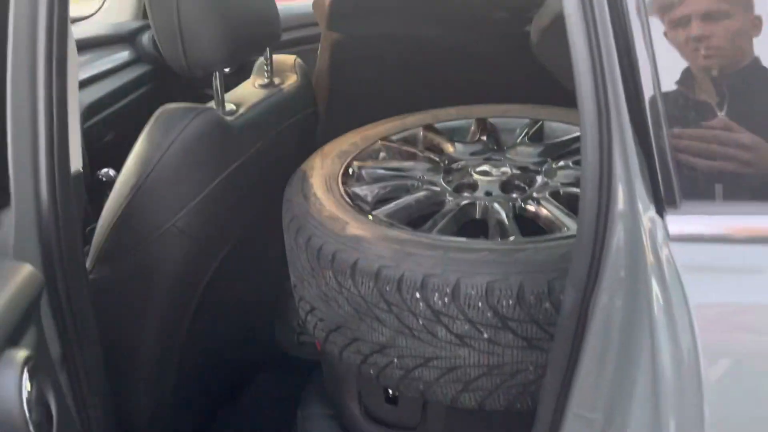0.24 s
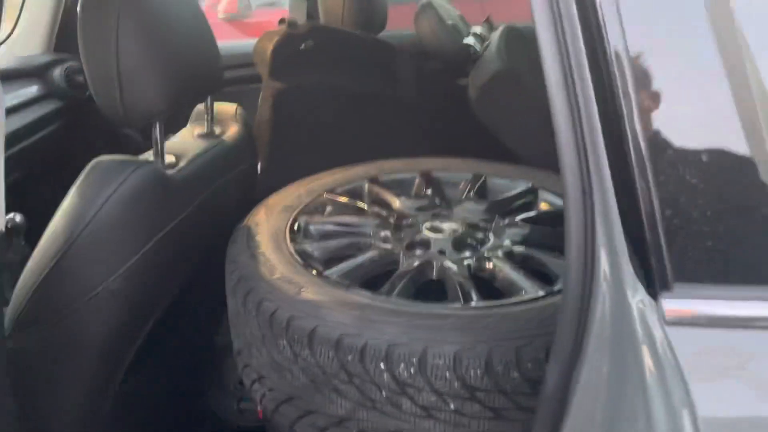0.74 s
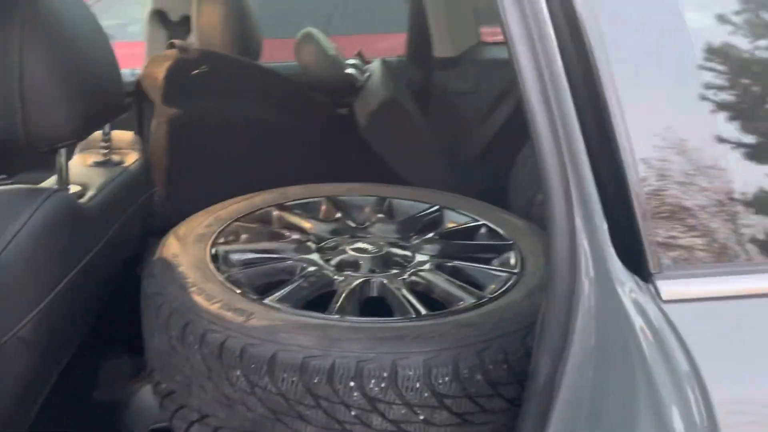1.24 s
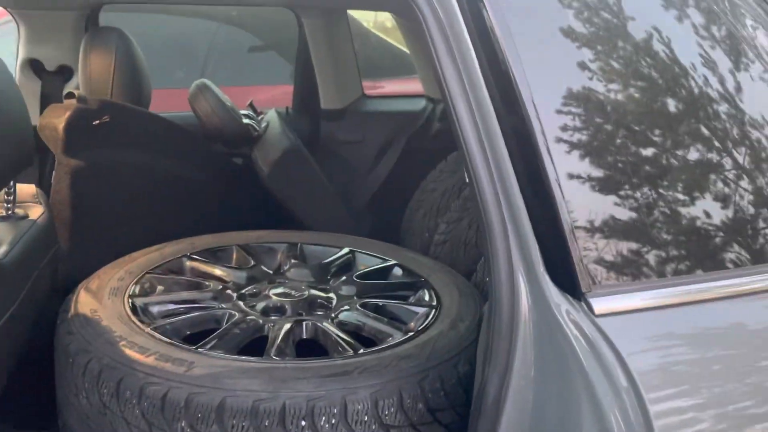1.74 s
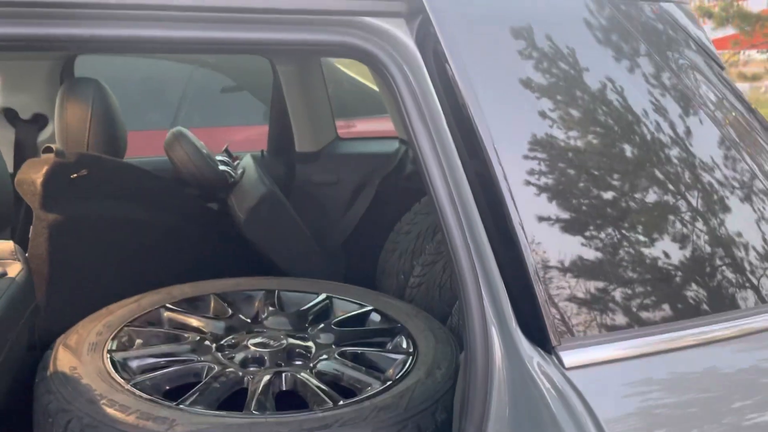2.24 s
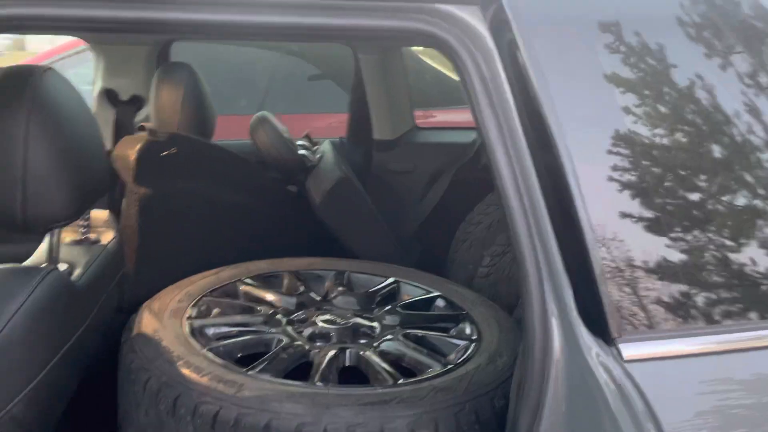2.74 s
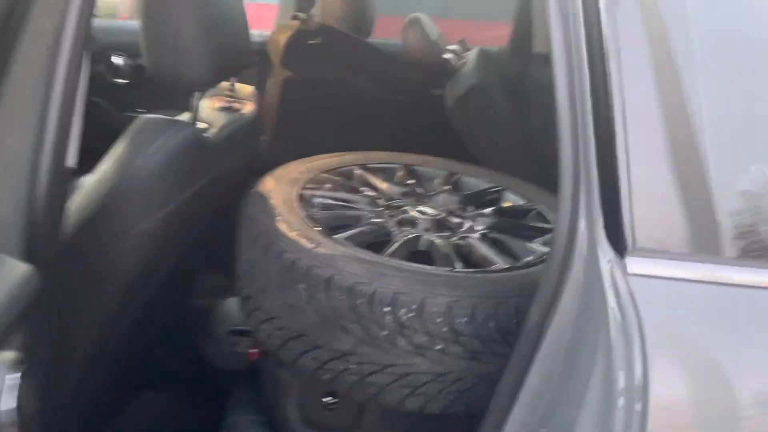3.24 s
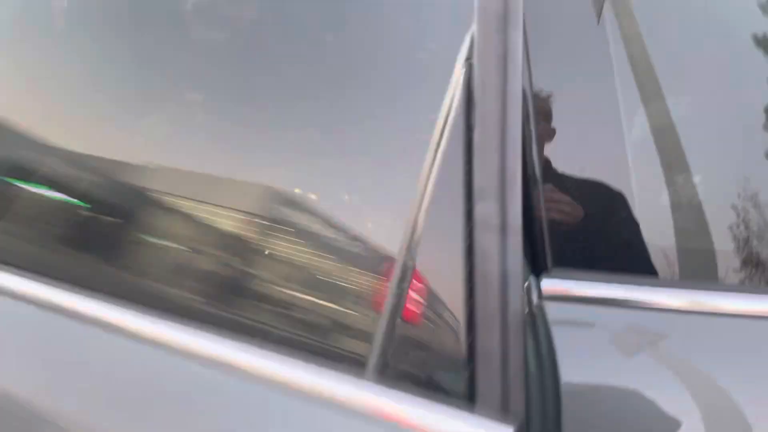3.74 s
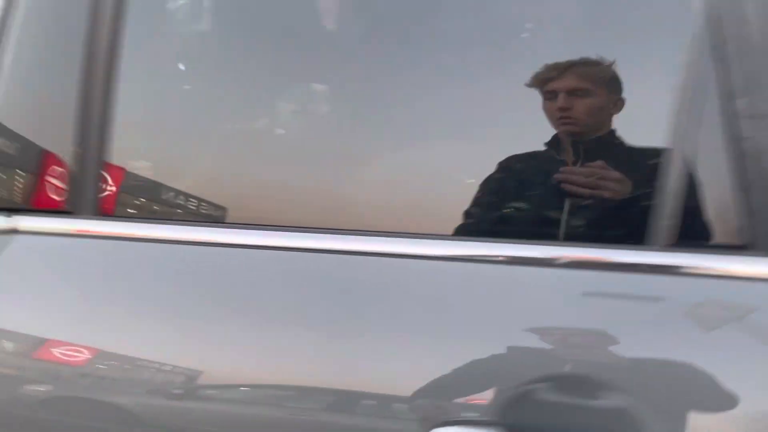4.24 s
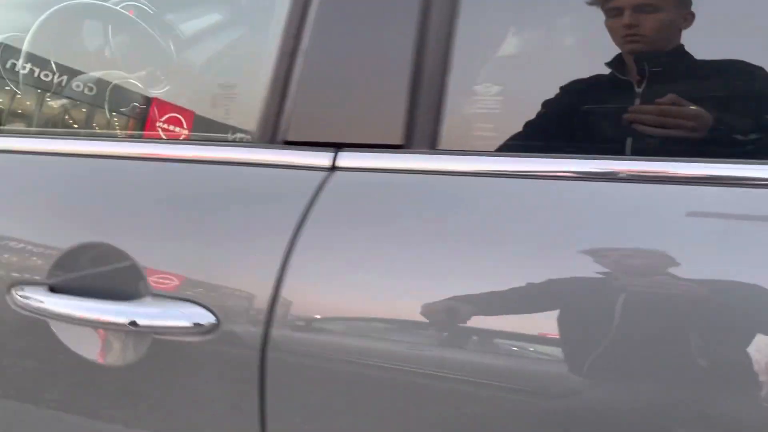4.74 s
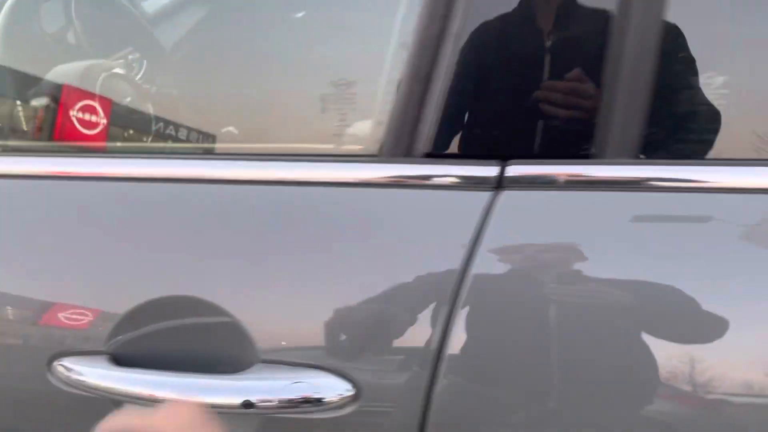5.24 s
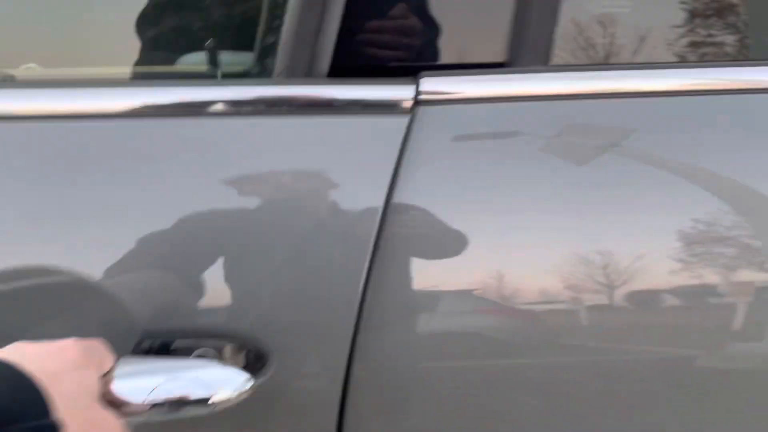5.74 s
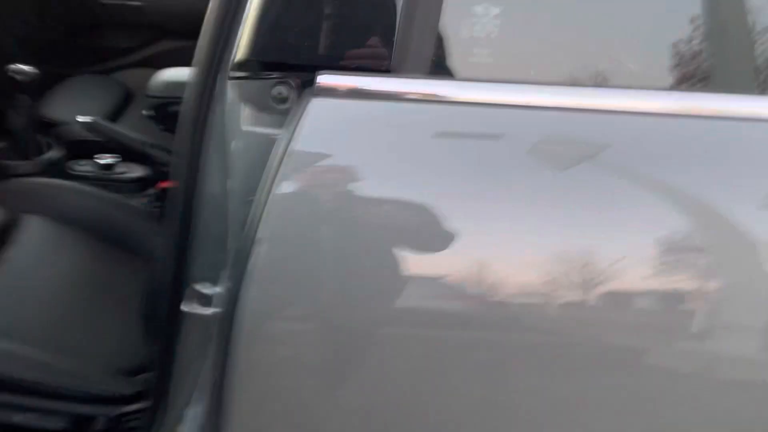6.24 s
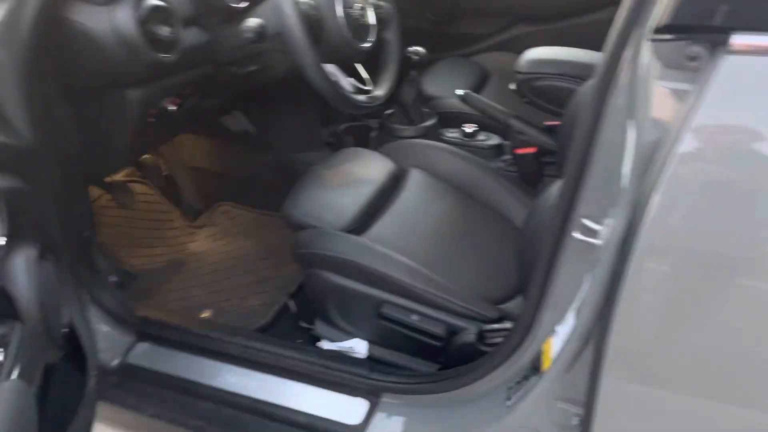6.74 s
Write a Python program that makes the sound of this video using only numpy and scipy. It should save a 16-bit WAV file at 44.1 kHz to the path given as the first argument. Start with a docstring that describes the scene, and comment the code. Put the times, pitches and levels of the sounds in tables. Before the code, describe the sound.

Keys jingle and a jacket rustles over outdoor traffic rumble; one car door thuds shut and another clunks open.

```python
"""Distant traffic rumbles over a car lot while a jacket rustles and keys jingle close by. A car passes
with a swell of tyre noise and engine tones. A rear door slams, a handle is pulled, and the front door
unlatches and swings into its stop. The fabric is a spray of tiny snaps; the keys tick and ring. Each
blow on a door rings its panel and cracks at the latch, and the cabin air booms as a door seals or unseals."""
import sys
import numpy as np
from scipy import signal
from scipy.fft import rfft, irfft
from scipy.io import wavfile

SR = 44100
rng = np.random.default_rng(int(sys.argv[2]) if len(sys.argv) > 2 else 0)


def materialize(psi):
    """Save the field psi as 16-bit PCM at rate SR to the path in sys.argv[1].

    A 1-D psi becomes a single channel; in a 2-D psi each row is a channel.
    """
    bounded = np.clip(np.atleast_2d(psi).T, -1, 1)
    quanta = np.round(bounded * 32767).astype(np.int16)
    wavfile.write(sys.argv[1], SR, quanta)


N = 308700
TIME = np.arange(N) / SR

# The crisp colour of jacket and keys. Each row: frequency in Hz, relative level in dB.
RUSTLE_SPECTRUM = [(900, -33), (1500, -8.5), (2200, -1.5), (2700, -5.5), (3300, -8.5), (5300, -9),
                   (6600, -9), (8100, -13), (9600, -9), (10500, -11.5), (12400, -16.5), (14000, -22),
                   (16000, -41)]
# The colour of door hardware cracking or scraping. Each row: frequency in Hz, relative level in dB.
HARDWARE_SPECTRUM = [(650, -4.5), (1150, -2), (1500, -4), (2400, -16.5), (4000, -15.5), (6400, -17.5),
                     (8300, -19.5), (11800, -28), (14000, -27), (16000, -52)]


def from_db(db):
    return 10 ** (np.asarray(db) / 20)


def rms_one(x):
    return x / np.sqrt(np.mean(x ** 2) + 1e-20)


def in_time(rows):
    s, *columns = np.transpose(rows)
    return [np.interp(TIME, s, c) for c in columns]


def at_hz(points, hz):
    table = np.array(points)
    return np.interp(np.log(hz + 1), np.log(table[:, 0] + 1), table[:, 1])


def fade(t, t60):
    return from_db(-60 * t / max(t60, .003))


def drift(rate_hz):
    """A smooth random wander with rms 1."""
    r = np.exp(-80 * np.pi * rate_hz / SR)
    slow = signal.lfilter([1], [1, -2 * r, r * r], rng.standard_normal(N // 40 + 2002))[2000:]
    return np.interp(np.arange(N) / 40, np.arange(len(slow)), rms_one(slow))


def colour(x, spectrum):
    """Shapes a signal by a spectrum in dB and sets its rms to 1."""
    hz = np.fft.rfftfreq(x.shape[-1], 1 / SR)
    return rms_one(irfft(rfft(x) * from_db(at_hz(spectrum, hz)), x.shape[-1]))


def resonate(x, hz, width_hz):
    """A band resonance with gain 1 at its peak."""
    r = np.exp(-np.pi * width_hz / SR)
    feedback = [1, -2 * r * np.cos(2 * np.pi * hz / SR), r * r]
    return signal.lfilter([(1 - r * r) / 2, 0, (r * r - 1) / 2], feedback, x)


def diffuse(spectrum):
    """Noise from all around: centred in the bass, widest in the midrange."""
    # How alike the two sides are. Each row: frequency in Hz, likeness from 0 to 1.
    likeness = [(60, 1), (130, 0.95), (290, 0.79), (640, 0.43), (1400, 0.075), (3100, 0.47), (6800, 0.35),
                (15000, 1)]
    alike = np.clip(at_hz(likeness, np.fft.rfftfreq(N, 1 / SR)), 0, 1)
    mid, side = rfft(rng.standard_normal((2, N)))
    pair = np.sqrt(1 + alike) * mid + np.sqrt(1 - alike) * side * [[1], [-1]]
    return colour(irfft(pair, N), spectrum)


def tone(rows, waver_db):
    """A wavering sine on a pitch curve, faded in and out."""
    hz, level_db = in_time(rows)
    start, end = rows[0][0], rows[-1][0]
    gate = np.interp(TIME, [start, start + 0.11, end - .1, end], [0, 1, 1, 0])
    sine = np.sqrt(2) * np.sin(2 * np.pi * np.cumsum(hz) / SR)
    return gate * from_db(level_db + waver_db * drift(11)) * sine


def strokes(rows, rise_db_per_s, fall_db_per_s, rest_db):
    """Level in dB of movements that rise, hold and fall back to rest."""
    level_db = np.full(N, float(rest_db))
    for s, hold, peak_db in rows:
        before, after = np.maximum(s - TIME, 0), np.maximum(TIME - s - hold, 0)
        level_db = np.maximum(level_db, peak_db - rise_db_per_s * before - fall_db_per_s * after)
    return level_db


def add(out, s, piece, pan_db=0):
    """Mixes a piece in at s seconds; positive pan is to the left."""
    at = round(s * SR)
    out[:, at:at + len(piece)] += piece[:N - at] * from_db([[pan_db / 2], [-pan_db / 2]])


def traffic():
    """Distant traffic all around: a lumpy rumble under a smoother roar."""
    # The traffic's ebb and flow. Each row: time in seconds, relative rumble and roar levels in dB.
    swells = [(0.0, -30.5, -51), (0.37, -28, -51), (0.6, -33, -51.5), (1.0, -30.5, -51), (1.65, -34.5, -51),
              (2.1, -32, -53), (2.55, -31.5, -50.5), (3.1, -29.5, -50.5), (3.7, -33, -50),
              (4.05, -29.5, -53), (4.4, -33.5, -51), (5.2, -33.5, -53.5), (6.2, -32.5, -52.5),
              (7.0, -36, -54)]
    # The colours of the two layers. Each row: frequency in Hz, relative level in dB.
    rumble_spectrum = [(12, -67), (20, -26), (36, -12), (81, 4), (129, -2), (192, -12.5), (238, -10),
                       (359, -16), (403, -22), (600, -28), (780, -42), (1320, -120)]
    roar_spectrum = [(180, -44), (300, -3.5), (423, -4.5), (550, -5.5), (828, -2), (1100, -8.5),
                     (1400, -15), (2400, -22), (3300, -30), (4930, -39), (7300, -43.5), (9490, -84),
                     (11900, -74), (15500, -72)]
    rumble_db, roar_db = in_time(swells)
    rumble = from_db(rumble_db + 1.7 * drift(1.5)) * diffuse(rumble_spectrum)
    roar = from_db(roar_db + 11 + 1.1 * drift(4.8)) * diffuse(roar_spectrum)
    return rumble + roar


def ringing_keys():
    """Keys hanging free ring until touched; the small one has two close modes that beat."""
    # When each key rings. Each row: start in seconds, level in dB, stop in seconds.
    small_rings = [(0.0, -61, .03), (.06, -59, .11), (.34, -72, .39), (.484, -44.5, .76), (1.209, -61, 1.5),
                   (4.835, -52, 4.9), (5.058, -70, 5.12), (5.885, -59, 5.94), (6.293, -50.5, 6.47),
                   (6.47, -58, 6.68), (6.685, -63, 6.76), (6.92, -70, 7.0)]
    large_rings = [(.391, -53, .42), (.484, -30.5, .78), (1.209, -52, 1.5), (4.835, -61, 4.9),
                   (5.459, -56, 5.5), (5.767, -63, 5.85)]
    # Each key's modes. Each row: frequency in Hz, relative level in dB, t60 in seconds.
    small_modes = [(10600, 0, .5), (10613, -6, .4)]
    large_modes = [(5590, 0, .075)]
    out = np.zeros((2, N))
    for rings, modes in [(small_rings, small_modes), (large_rings, large_modes)]:
        for s, level_db, until in rings:
            t = TIME[:round((until - s) * SR)]
            release = np.clip((t[-1] - t) / 0.0072, 0, 1)
            for hz, mode_db, t60 in modes:
                ring = fade(t, t60) * np.sin(2 * np.pi * hz * t)
                add(out, s, from_db(level_db + mode_db) * release * ring)
    return out


def jacket_rustle(snaps_per_s=5000, clump_db=3, clinks_per_s=500):
    """Stiff fabric gives clumps of tiny snaps, with faint clinks from the bunch of keys."""
    # Jacket and keys moving. Each row: start in seconds, hold in seconds, relative level in dB.
    moves = [(0.05, .01, -49), (0.14, 0.15, -49), (0.4, 0.0087, -52), (0.48, .02, -47), (0.9, 0.16, -60.5),
             (1.1, 0.12, -57), (1.28, .01, -52.5), (3.03, 0.033, -52.5), (3.15, .13, -60),
             (3.48, 0.0077, -66), (3.64, 0.11, -60), (4.09, 0.098, -58.5), (4.3, 0.23, -63),
             (4.71, 0.18, -51.5), (4.95, 0.38, -55), (5.39, 0.12, -52.5), (5.55, 0.12, -51.5),
             (5.68, 0.01, -39.5), (5.86, 0.077, -54), (6.295, 0.0087, -60), (6.36, 0.3, -56.5),
             (6.78, 0.12, -51.5)]
    snapping = rng.random((2, N)) < snaps_per_s * from_db(clump_db * drift(30)) / SR
    strength = from_db(3.3 * np.minimum(rng.exponential(1, N), 5))
    mid, side = snapping * strength * rng.choice([-1, 1], N)
    snaps = colour(mid + 0.18 * side * [[1], [-1]], RUSTLE_SPECTRUM)
    touches = (rng.random(N) < clinks_per_s / SR) * rng.standard_normal(N) + 1e-18
    pitches, struck = np.geomspace(2200, 13000, 24), rng.integers(0, 24, N)
    clinks = sum(resonate(touches * (struck == k), hz, width_hz=200) for k, hz in enumerate(pitches))
    moving_db = strokes(moves, rise_db_per_s=602, fall_db_per_s=186, rest_db=-69)
    return from_db(moving_db - 4) * (snaps + from_db(-5) * colour(clinks, RUSTLE_SPECTRUM))


def key_ticks(t60=0.066):
    """Keys knock together: a short scratch, a pitched clink and ping, and a thin treble chink."""
    # Key against key. Each row: start in seconds, relative level in dB, pitch in Hz,
    # relative treble level in dB.
    ticks = [(0.053, -35.5, 2540, -40), (0.1297, -38, 2600, -50), (0.1544, -41, 2620, -51),
             (0.212, -29, 2640, -51), (0.2344, -32, 2600, -60), (0.246, -35, 2150, -59),
             (0.285, -37, 2640, -42), (0.3113, -31.5, 4060, -43), (0.322, -35, 2840, -38),
             (0.3663, -42, 2500, -65), (0.3912, -38, 5570, -37), (0.4444, -34, 2530, -61),
             (0.483, -29, 5960, -40), (0.5104, -36, 2650, -39), (0.5914, -44, 3670, -50),
             (0.882, -39.5, 2570, -69), (0.946, -45, 2600, -49), (1.04, -39.5, 2700, -57),
             (1.1238, -37.5, 4390, -73), (1.209, -39, 2620, -47), (1.2794, -45, 3820, -44.5),
             (2.0887, -46, 2750, -58), (3.022, -35, 2960, -63), (3.1456, -48, 2470, -38.5),
             (3.181, -48, 2500, -50), (3.2153, -38, 2320, -55), (3.263, -58, 2720, -43),
             (3.465, -39, 2390, -49), (3.4813, -43, 2430, -63), (3.699, -42, 2370, -54),
             (3.968, -49, 5500, -57), (4.11, -44.5, 2880, -68), (4.735, -32.5, 2700, -57),
             (4.7536, -36.5, 2580, -52), (4.813, -40, 3700, -60), (4.8329, -31.5, 5230, -37),
             (4.9, -45, 2400, -38.5), (5.0556, -42, 2490, -42), (5.09, -35, 2830, -66),
             (5.118, -35.5, 2920, -71), (5.268, -45, 2690, -47), (5.309, -35.5, 3140, -62),
             (5.383, -40.5, 3660, -65), (5.458, -34.5, 5100, -63), (5.478, -32, 2610, -59),
             (5.5044, -39, 5650, -51), (5.5354, -42, 5300, -44), (5.6116, -34, 5200, -61),
             (5.622, -32.5, 3700, -62), (5.667, -37, 6100, -50), (5.765, -39, 5500, -62),
             (5.8647, -37, 4500, -66), (6.098, -31, 4400, -60), (6.1513, -23.5, 2610, -48),
             (6.29, -45, 2860, -47), (6.4186, -47, 2460, -49), (6.4662, -54, 2480, -43),
             (6.557, -46, 2720, -44), (6.686, -34.5, 2850, -64), (6.7742, -40, 2700, -50),
             (6.8, -34.5, 6370, -49), (6.912, -49, 5420, -50)]
    out, t = np.zeros((2, N)), TIME[:SR // 8]
    for s, level_db, hz, treble_db in ticks:
        pan_db = 2 + 4.5 * rng.standard_normal()
        white = rng.standard_normal((3, len(t))) * np.minimum(t / 0.00055, 1)
        scratch = colour(white[0], RUSTLE_SPECTRUM) * (fade(t, t60) + 0.8 * fade(t, 0.0082))
        clink = resonate(white[1] * fade(t, 0.99 * t60), hz, width_hz=350)
        ping = fade(t, t60=0.019) * np.sin(2 * np.pi * hz * t)
        body = from_db(-13) * scratch + from_db(4.5) * clink + from_db(-10.5) * ping
        burst = white[2] * fade(t, 0.5 * t60)
        chink = resonate(burst, 9660, width_hz=850) + from_db(-22) * resonate(burst, 11400, width_hz=810)
        add(out, s, from_db(level_db) * body + from_db(treble_db + 12) * chink, pan_db)
    return out


def passing_car(closest_s=2.45, closest_db=-35.5, width_s=0.43):
    """Tyre noise swells and falls with distance; an exhaust note and an engine drone follow."""
    # Tyres on the road. Each row: frequency in Hz, relative level in dB.
    tyre_spectrum = [(350, -21.5), (550, -1), (750, 3), (1000, -0.5), (1300, -12.5), (2000, -38),
                     (4000, -29), (8000, -50)]
    # The car's two tones. Each row: time in seconds, pitch in Hz, level in dB.
    exhaust_note = [(2.4, 201.6, -52.5), (2.63, 198, -40), (2.8, 217, -46)]
    engine_note = [(2.7, 101.4, -52), (2.85, 104.8, -30), (3.3, 103.3, -27), (3.43, 103, -47),
                   (3.5, 99.1, -26.5), (3.68, 104.7, -39), (3.9, 110.6, -22.5)]
    distance_squared = 1 + ((TIME - closest_s) / width_s) ** 2
    tyres = from_db(closest_db) / distance_squared * diffuse(tyre_spectrum)
    engine = tone(engine_note, waver_db=-1.5) * from_db([[1], [-1]])   # a little to the left
    return tyres + tone(exhaust_note, waver_db=7.5) + engine


def door_blows(crack_low_hz=1190):
    """Each blow rings the panel modes nearest its pitch most, and cracks and rattles at the latch."""
    # Blows on the doors. Each row: start in seconds, relative panel level in dB, panel pitch in Hz,
    # ring-time factor, relative crack level in dB, latch pitch in Hz, left minus right in dB.
    blows = [(3.469, -21, 170, 0.34, -52, 2400, 2), (3.882, 5, 900, 0.17, -38, 1690, -2),
             (3.887, 3, 750, 0.66, -19, 2930, 1), (3.897, -5, 690, 0.27, -20, 3440, 2),
             (3.904, -1.5, 205, 0.52, -24.5, 2040, 0), (3.918, -3.5, 171, 0.37, -18, 2440, 2.5),
             (3.951, -7, 265, 0.4, -29, 2520, 1.5), (3.997, -14.5, 206, 0.25, -46.5, 4000, 0.5),
             (4.745, -17.5, 1042, 0.27, -45, 2640, 1), (5.287, -22.5, 600, .3, -43, 2060, 3),
             (5.290, -16.5, 250, 0.2, -49, 2100, 1), (5.639, -18, 550, 0.47, -48, 2500, 6.5),
             (5.658, -15.5, 350, 0.37, -52, 3020, 2.5), (5.677, -14, 250, 0.64, -37, 3330, 2),
             (5.692, -16.5, 630, 0.54, -38.5, 2770, 8), (5.730, -17, 420, 0.35, -43, 3650, 5),
             (6.2122, -40, 600, 0.1, -22.5, 2580, 2.5), (6.2135, 0.5, 473, 0.25, -30, 4430, 6.5),
             (6.220, -8, 506, 0.38, -37, 2100, 8), (6.225, -6.5, 614, 0.25, -50, 2740, 7),
             (6.232, -14.5, 348, 0.36, -47, 2000, -6), (6.254, -4, 260, 0.11, -59, 2020, 3),
             (6.782, -21.5, 607, 0.47, -46, 2180, 2)]
    # The panel's modes. Each row: frequency in Hz, relative level in dB, base t60 in seconds.
    panel_modes = [(128.3, 8.5, 0.28), (181.4, 4, 0.4), (205, 4, 0.18), (250, 7.5, 0.15), (340.5, 3, 0.27),
                   (337, -13.5, 0.083), (415, -12, 0.39), (458, 8.5, 0.08), (544, -6.5, 0.35),
                   (623, -4, 0.25), (690, 2, 0.19), (844, -7.5, 0.23), (986, 1, 0.11), (1042, -3.5, 0.16)]
    out, t = np.zeros((2, N)), TIME[:SR // 3]
    hz, mode_db, t60 = np.transpose(panel_modes)[:, :, None]
    low_cut = signal.butter(2, crack_low_hz, "high", fs=SR, output="sos")   # a small latch has no bass
    for s, panel_db, pitch_hz, ring_factor, crack_db, latch_hz, pan_db in blows:
        near_db = -14 * np.abs(np.log2(hz / pitch_hz))
        decay_db = -60 * t / (t60 * ring_factor)
        gain_scatter, phase_scatter = rng.random((2, len(panel_modes), 1))
        # bending waves arrive at slightly different moments, so the modes start out of step
        waves = np.sin(2 * np.pi * (hz * t + 0.46 * phase_scatter))
        modes = from_db(mode_db + near_db + 5.2 * gain_scatter + decay_db) * waves
        panel = from_db(panel_db - 8.5) * modes.sum(axis=0) * np.minimum(t / 0.0052, 1)
        # a sharp snap, then a rattle that lasts longer when the panel rings longer
        rattle_t60 = 0.033 + 0.1 * ring_factor
        envelope = (fade(t, rattle_t60) + 1.25 * fade(t, 0.0085)) * np.minimum(t / 0.0011, 1)
        crack = envelope * signal.sosfilt(low_cut, colour(rng.standard_normal(len(t)), HARDWARE_SPECTRUM))
        rattle = resonate(rng.standard_normal(len(t)) * fade(t, rattle_t60), latch_hz, width_hz=320)
        ping = fade(t, t60=0.022) * np.sin(2 * np.pi * latch_hz * t)
        latch = from_db(3.5) * crack + from_db(15) * rattle + from_db(1.5) * ping
        add(out, s, panel + from_db(crack_db) * latch, pan_db)
    return out


def cabin_boom():
    """Low modes of the cabin air swell and die away when a door seals or unseals."""
    # Air modes. Each row: start in seconds, level in dB, pitch in Hz, t60 and rise time in seconds.
    booms = [(3.903, -11.5, 62.8, 1.26, 0.0086), (3.905, -26, 69.5, 1, 0.0062),
             (3.905, -33, 35.5, 2, 0.025), (5.691, -15, 123, 0.36, 0.01), (5.70, -22, 69.7, 0.84, .02)]
    out, t = np.zeros((2, N)), TIME[:SR]
    for s, level_db, hz, t60, rise in booms:
        envelope = (1 - np.exp(-t / rise)) * fade(t, t60)
        add(out, s, from_db(level_db) * envelope * np.sin(2 * np.pi * hz * t))
    return out


def thin_hum():
    """A faint, nearly steady hum hangs in the air after the slam."""
    # The hum's course. Each row: time in seconds, pitch in Hz, level in dB.
    hum_note = [(4.05, 357.4, -55), (4.55, 356.6, -51), (5.37, 358, -45.5), (5.6, 350.5, -51)]
    return tone(hum_note, waver_db=2)


def door_scrape():
    """The handle linkage and the door stop slide with dense, uneven friction."""
    # Sliding contacts. Each row: start in seconds, hold in seconds, level in dB.
    slides = [(5.62, .045, -47), (5.685, 0.009, -43), (5.725, 0.018, -38), (6.202, .009, -34)]
    sliding_db = strokes(slides, rise_db_per_s=2500, fall_db_per_s=1500, rest_db=-120)
    return from_db(sliding_db + 1.4 * drift(60)) * colour(rng.standard_normal(N), HARDWARE_SPECTRUM)


def scene():
    """Jacket, keys and doors up close, traffic all around."""
    background = traffic() + passing_car() + thin_hum()
    jacket_and_keys = ringing_keys() + jacket_rustle() + key_ticks()
    return background + jacket_and_keys + door_blows() + cabin_boom() + door_scrape()


def record(dry):
    """Two microphone ports differ in phase and level; peaks are rounded and the top is cut."""
    # Balance between the ports. Each row: frequency in Hz, left minus right in dB.
    balance = [(60, 3), (110, 1), (200, 2), (380, 1.5), (700, 0.0), (1290, -1.5), (2380, 0), (4400, 2.5),
               (8120, 0), (15000, -2)]
    # Phase between the ports. Each row: frequency in Hz, the left port's lead in half turns.
    phase_lead = [(20, 0), (600, -.05), (1290, -.4), (2400, .1), (3200, .25), (4100, 0), (6100, .05),
                  (7670, -1), (8900, -1), (10400, -2), (13000, -2), (14000, -3), (15600, -3), (16400, -2)]
    hz = np.fft.rfftfreq(N, 1 / SR)
    left = from_db(at_hz(balance, hz) / 2) * np.exp(1j * np.pi / 2 * at_hz(phase_lead, hz))
    ports = irfft(rfft(dry) * [left, 1 / left], N)
    rounded = 1.174 * np.tanh(ports / 1.134)
    high_cut = signal.cheby2(12, 70, 16600, fs=SR, output="sos")
    return signal.sosfilt(high_cut, rounded)


dry = scene()
out = record(dry)
materialize(out)
```